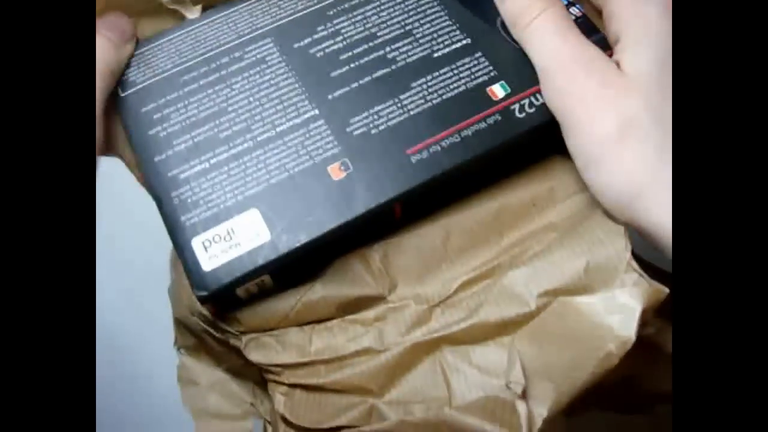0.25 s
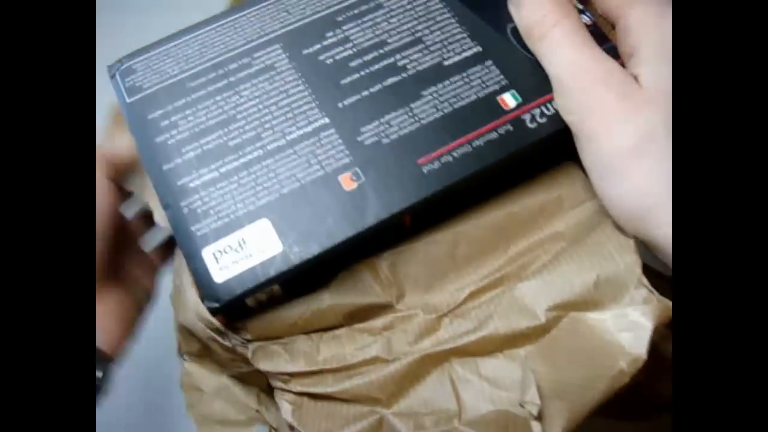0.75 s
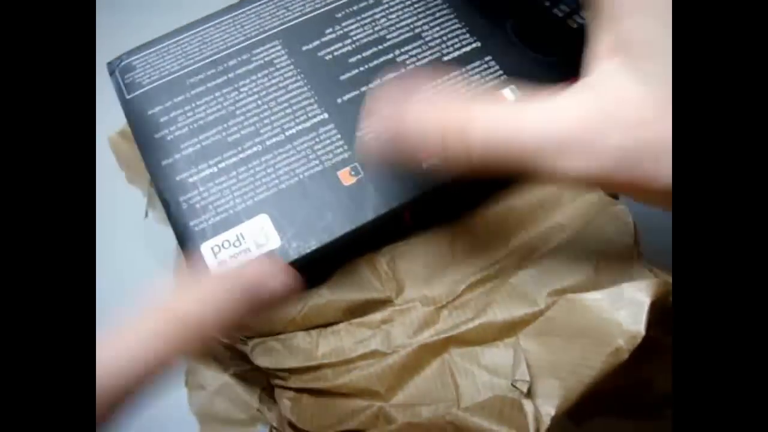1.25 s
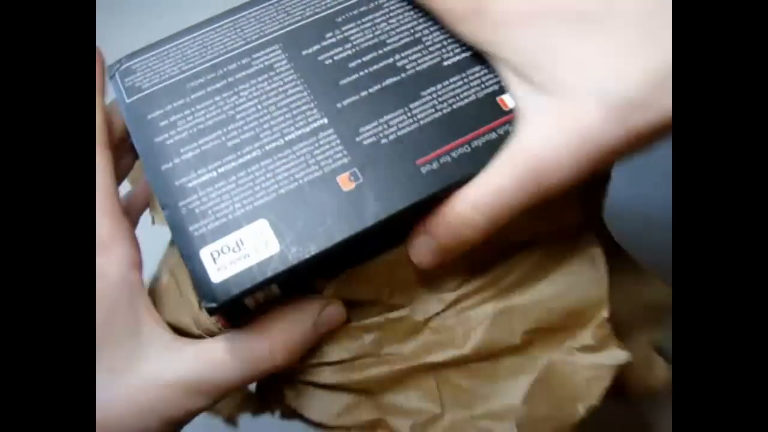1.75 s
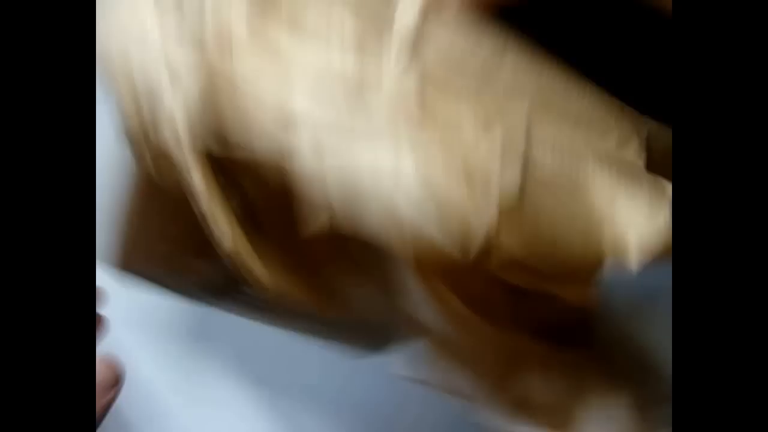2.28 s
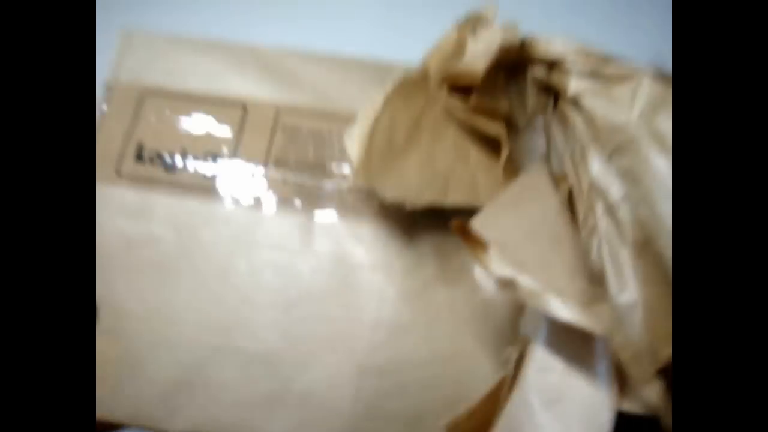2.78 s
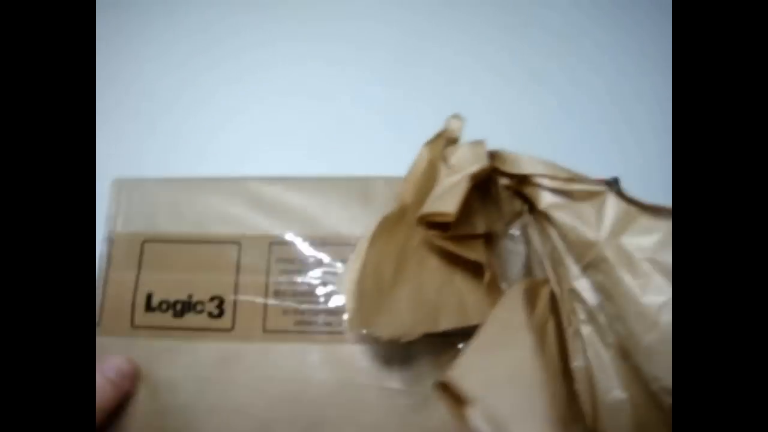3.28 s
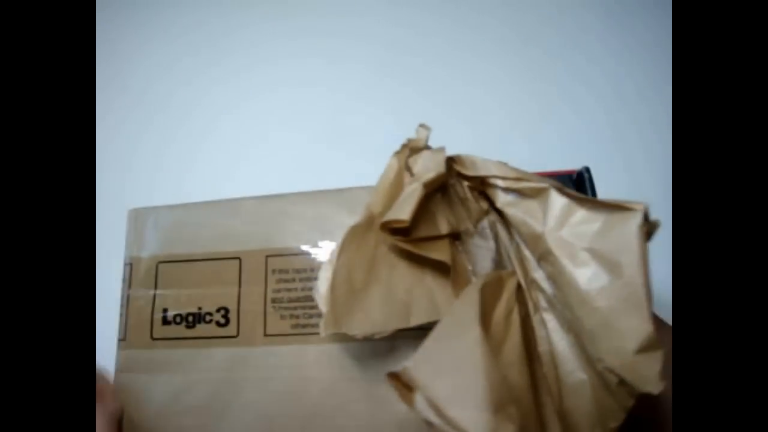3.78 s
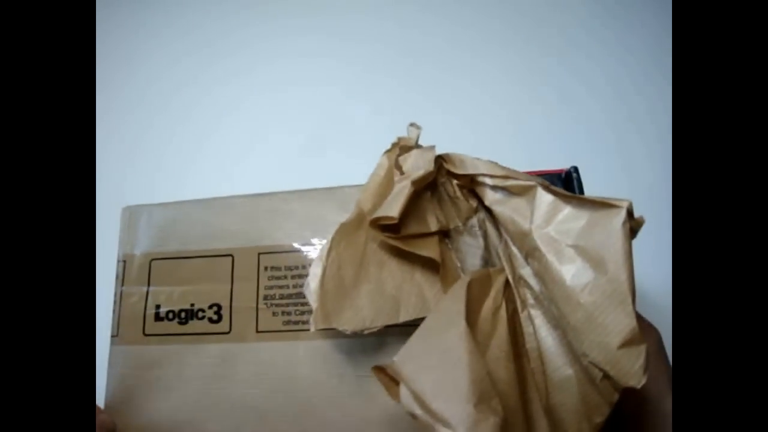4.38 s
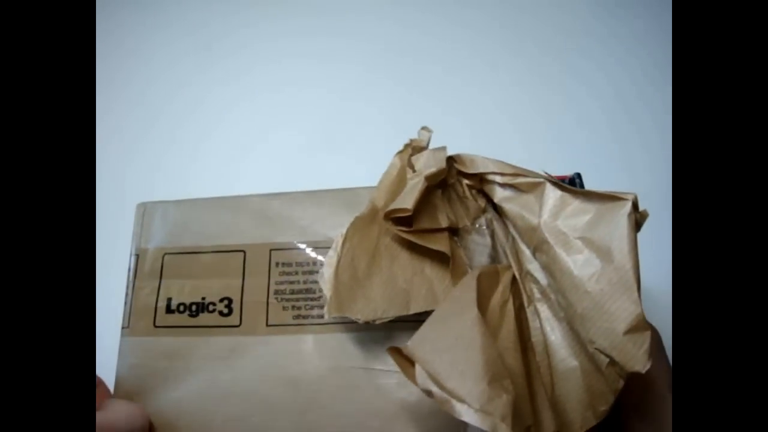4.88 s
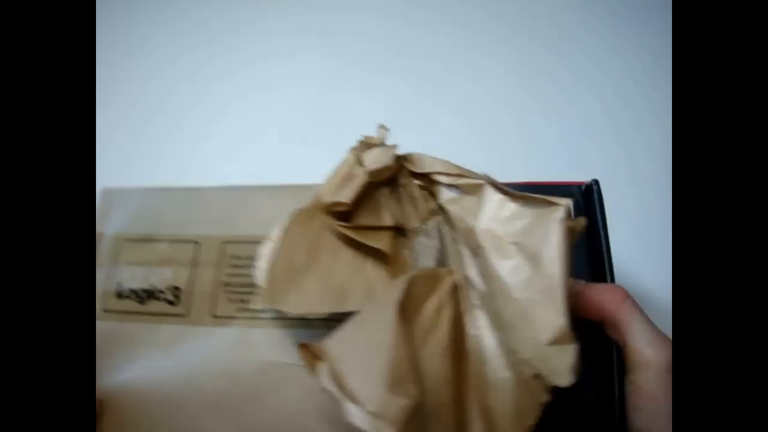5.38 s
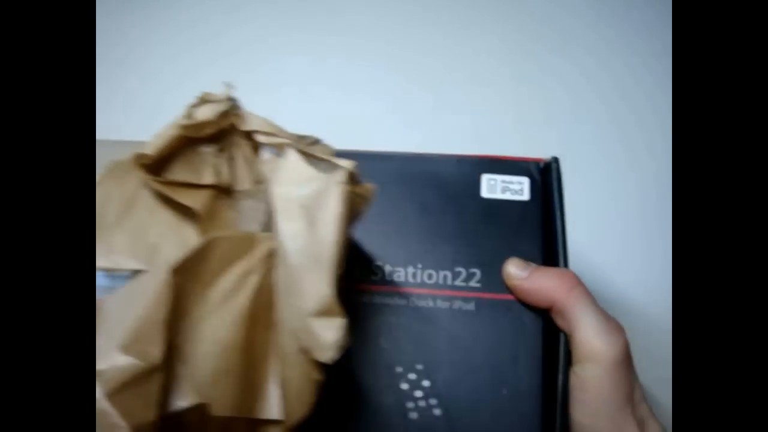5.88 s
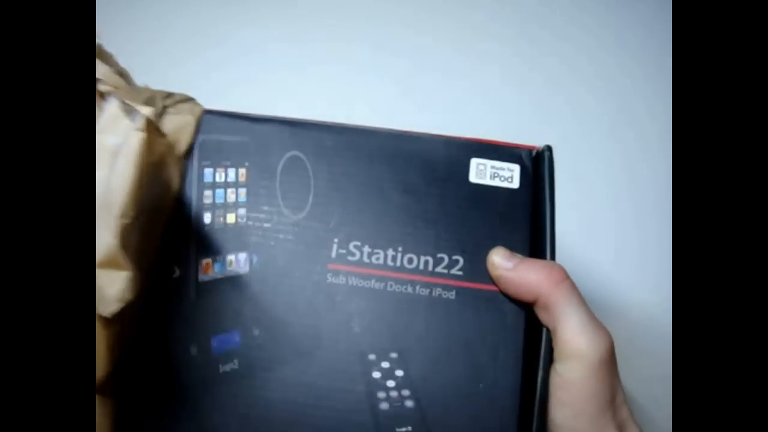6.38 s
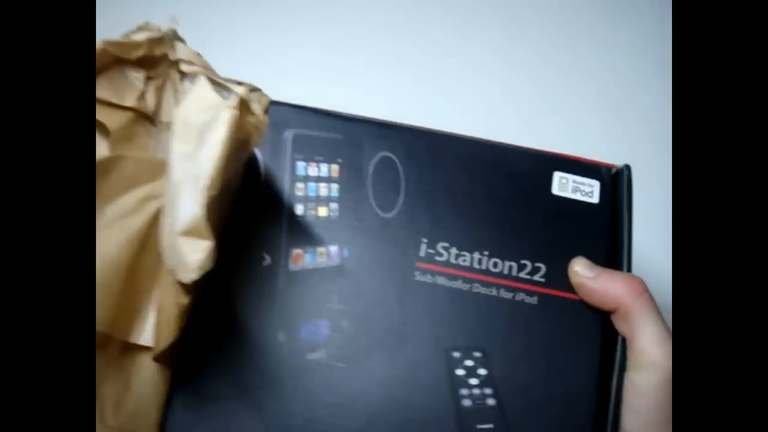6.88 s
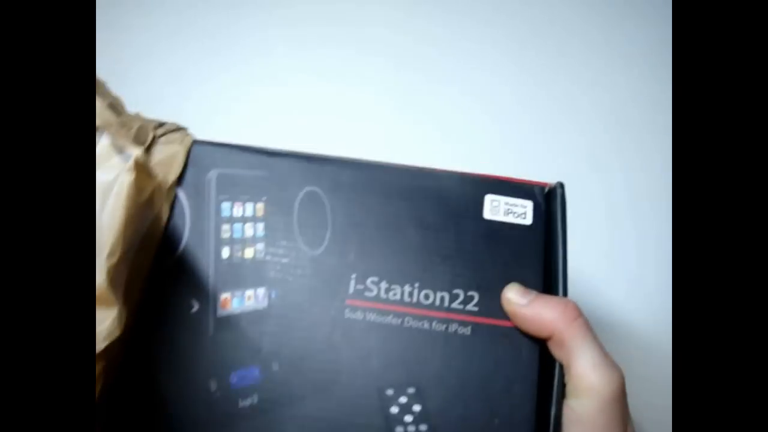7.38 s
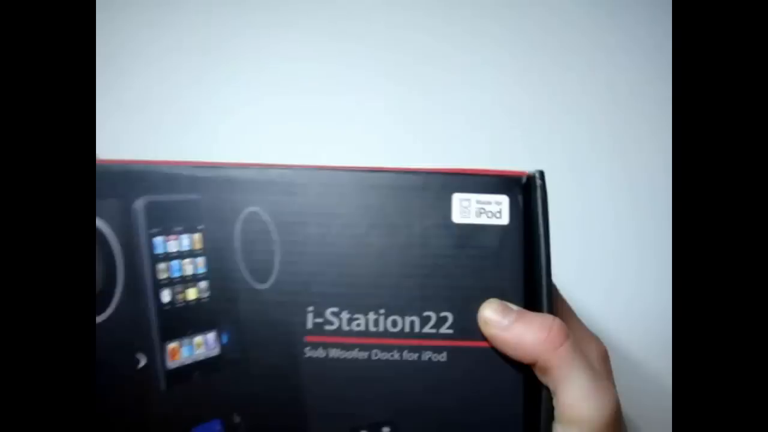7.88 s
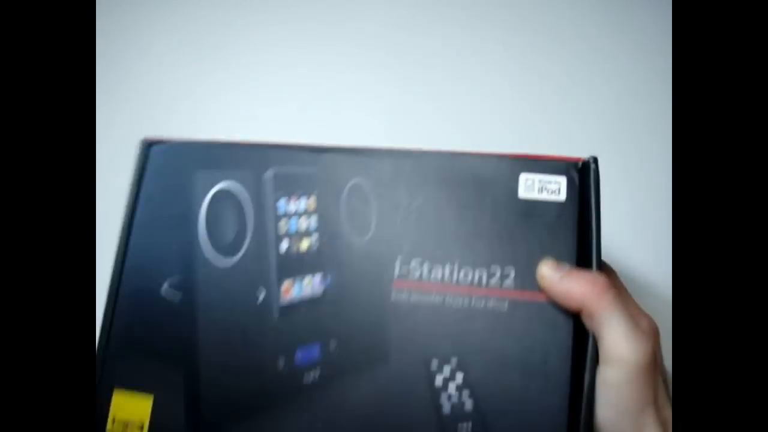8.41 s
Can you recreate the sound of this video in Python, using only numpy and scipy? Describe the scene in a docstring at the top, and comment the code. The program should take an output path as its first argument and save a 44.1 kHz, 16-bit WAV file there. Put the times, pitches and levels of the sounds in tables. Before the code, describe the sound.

Stiff packing paper is handled very close to one microphone in a small room. A short rustle breaks into a flurry of sharp snaps, then a gap, a few hard pulls, scattered creasing, and a longer steady slide off a cardboard box. Hollow rustles and dull bumps come from the box; low air puffs hit the microphone. A faint fan hums behind.

```python
"""A short rustle, then sharp snaps: stiff brown packing paper is pulled off a cardboard box, close to one
microphone in a small room. Creases buckle as cascades of slips that crack and ring the facets beside them.
Crackle and hiss make the rustle, which also sounds hollow through the box; edges scrape and bumps thud.
The moving sheet pushes puffs of air at the microphone, and a fan, made of coloured noise, runs faintly behind."""
import sys
import numpy as np
from scipy import signal
from scipy.fft import rfft, irfft, next_fast_len
from scipy.io import wavfile
from scipy.ndimage import uniform_filter1d

SR = 44100
rng = np.random.default_rng(int(sys.argv[2]) if len(sys.argv) > 2 else 0)


def generate_wav(sig):
    """Save sig (samples, or channels by samples) to the path in sys.argv[1] as 16-bit PCM at SR."""
    pcm = np.round(np.clip(np.atleast_2d(sig).T, -1, 1) * 32767).astype(np.int16)
    wavfile.write(sys.argv[1], SR, pcm)


N = 381465

TOP_HZ = 10100  # band limit of the camera, also the ceiling for facets and cracks

# The loudest creases to buckle, close to the microphone. Each row: start in seconds, level of the click in dB,
# ring of the freed facet in Hz, length scale of the cascade in seconds, ring over crack in dB.
SNAPS = [(0.1263, -24.5, 3740, 0.0023, -5), (0.1951, -19.5, 3560, 0.0042, 1),
         (0.238, -25, 1240, 0.0017, -12), (0.2755, -25, 1240, 0.00087, -5), (0.288, -21, 2640, 0.0026, -6),
         (0.318, -26, 3150, 0.0012, -3), (0.37, -25, 1380, 0.003, -3), (0.473, -33, 2270, 0.0045, 0),
         (0.519, -25, 4400, 0.002, -17), (0.5429, -17.5, 2270, 0.0056, -7), (0.556, -19, 3620, 0.0013, -3),
         (0.586, -17.5, 1970, 0.001, 8), (0.622, -23, 1420, 0.0033, -2), (0.651, -18.5, 2540, 0.0023, 6),
         (0.752, -30, 2800, 0.0014, -4), (0.783, -18, 2810, 0.011, -15), (0.817, -21, 2230, 0.0024, 1),
         (0.867, -25, 1270, 0.0012, 8), (0.878, -21.5, 4500, 0.007, -22), (0.934, -26.5, 4500, 0.0021, 0),
         (1.243, -38.5, 1480, 0.0054, 6), (1.5255, -27, 1320, 0.0047, -17), (1.545, -29, 1110, 0.0031, -8),
         (1.574, -25, 2470, 0.0044, -8), (1.5904, -24, 1320, 0.0027, -10), (1.683, -20, 1470, 0.0028, -16),
         (1.799, -18, 1450, 0.0012, -3), (1.9698, -33, 2200, .001, -1), (2.1442, -35, 3000, 0.0012, -3),
         (2.2291, -30.5, 2310, 0.0028, -5), (2.5726, -38, 2310, 0.001, -2), (2.6441, -24, 3420, 0.002, 1),
         (2.669, -27.5, 4180, 0.0033, -6), (2.8116, -23.5, 2600, 0.0023, 8),
         (2.89, -22.5, 1980, 0.0021, 4.5), (3.033, -21.5, 1750, 0.0041, -17),
         (3.206, -23, 1700, 0.0045, -1), (3.273, -38, 2950, .0015, 9), (3.3225, -32, 2600, 0.0033, -7),
         (3.3808, -29, 4930, 0.0012, 2), (3.4001, -16, 3150, 0.0081, -7), (3.4125, -23.5, 4730, 0.0036, 10),
         (3.515, -29, 890, 0.0015, 4), (3.5736, -21, 1450, 0.0043, -20), (3.6528, -18.5, 3120, 0.0059, -23),
         (3.761, -19, 2380, 0.0035, 1.5), (3.7904, -27, 4170, 0.0016, 6), (3.8295, -26.5, 3670, 0.002, -25),
         (3.838, -29, 1300, 0.002, -9), (3.9721, -29.5, 2720, 0.0013, -12),
         (4.0537, -18, 3420, 0.0096, -15), (4.092, -26, 2990, 0.0033, -4), (4.266, -20.5, 2940, 0.0074, -6),
         (4.341, -22.5, 2770, 0.0044, -25), (4.347, -26, 1600, 0.0043, -16),
         (4.428, -25.5, 3470, 0.0012, 1), (4.6092, -29.5, 2560, 0.001, -20), (4.632, -33, 3970, 0.002, -8),
         (4.6841, -24.5, 3070, 0.0028, -1), (4.7109, -25.5, 4200, 0.0039, -8),
         (4.7438, -23.5, 2560, 0.0093, -20), (4.805, -33, 2400, 0.0011, -5),
         (4.8167, -35, 4180, 0.00092, -4), (4.8476, -28.5, 2320, 0.0011, 4),
         (4.8796, -28, 2330, 0.00096, -4), (4.895, -30.5, 1750, 0.0012, -13),
         (4.937, -32, 2310, 0.0027, -15), (5.0575, -26, 3200, 0.0038, -18),
         (5.1284, -24.0, 2520, 0.005, -15), (5.2135, -22, 3870, 0.0055, 1), (5.527, -21, 1790, 0.0028, -1),
         (6.0879, -20, 1230, 0.0016, 0), (6.6082, -21, 1020, 0.0032, 18), (6.636, -21, 2750, 0.0088, -6),
         (6.7458, -35.5, 2820, .0015, 6), (6.8197, -25.5, 2900, 0.0033, 0), (6.972, -31, 980, 0.0037, -13),
         (7.0306, -20, 1490, 0.0049, -15), (7.058, -27, 2580, 0.0066, 4), (7.099, -25.5, 2900, 0.0032, -12),
         (7.161, -30.5, 1710, 0.0046, 7), (7.302, -26.5, 855, 0.0038, -1), (7.3282, -26.5, 990, 0.0034, -4),
         (7.3552, -22.5, 2400, 0.0065, -21), (7.427, -24, 1470, 0.0036, 0), (7.5069, -14.5, 2460, 0.007, 1),
         (7.557, -17, 2470, 0.0048, 0.5), (7.633, -22, 2500, 0.0042, -5), (7.66, -27, 1530, 0.0018, -9),
         (7.8665, -19, 2340, 0.0092, -7), (8.3077, -20, 1980, 0.0058, -10),
         (8.3511, -22, 4400, 0.0065, -10), (8.4665, -26.5, 5150, 0.0055, -20),
         (8.6396, -26.5, 2730, 0.0028, -4)]
THUD_DB = -12.5  # the sheet's thud, relative to the snap that jolts it
FIRST_CLICK_DB, SOFTER_DB_PER_S = -4, 1001  # the opening click's share falls as the cascade gets longer


def snaps():
    """Each large snap also jolts the whole sheet, which answers with a dull, short thud."""
    track = np.zeros(N)
    for s, db, ring_hz, length, ring_db in SNAPS:
        first_db = FIRST_CLICK_DB - SOFTER_DB_PER_S * length
        click = snap(ring_hz, length, ring_db, first_db)
        add(track, s, amp(db) * level_in_10_ms(click + amp(THUD_DB) * thud()))
    return track


SLIPS_PER_S, FACET_Q = 3500, 3.16  # mean rate of slips within one snap; how purely a facet rings
# the broad crack: its reference centre, how far it follows the facet's pitch, its width relative to its centre
CRACK_HZ, CRACK_FOLLOWS, CRACK_WIDTH = 4750, 0.66, 2.25


def snap(ring_hz, length, ring_db, first_db, size=4096):
    """A crease gives way in a short cascade of separate slips; each cracks broadly and rings the facet beside it."""
    t = np.arange(size) / SR
    slips = np.tanh(rng.standard_normal(size)) * (rng.random(size) < SLIPS_PER_S / SR)
    fade_s = max(2.12 * length, 1 / SR)
    cascade = unit(slips * np.exp(-(t / fade_s) ** 2))
    cascade[0] = np.sqrt(size) * amp(first_db)  # the opening click
    ring = filtered(cascade, lambda f: resonance(f, ring_hz, ring_hz / FACET_Q) ** 2)
    crack_hz = CRACK_HZ * (ring_hz / CRACK_HZ) ** CRACK_FOLLOWS
    crack = filtered(cascade, lambda f: resonance(f, crack_hz, CRACK_WIDTH * crack_hz) ** 2 * (f < TOP_HZ))
    return unit(amp(ring_db) * unit(ring) + unit(crack))


# the largest ticks over the handling level, their ceiling, the spread below
TICK_OVER_DB, TICK_TOP_DB, TICK_RANGE_DB = 4, -25, 8
TICK_CROWDING = .9  # exponent: how strongly ticks crowd into the harder handling


def ticks(count=200):
    """Small creases let go at random, each with its own pitch; harder handling frees more and louder ones."""
    crisp_db, track = handling()[0], np.zeros(N)
    due = np.cumsum(amp(TICK_CROWDING * crisp_db) * unevenness(np.arange(N) / SR) ** 2)
    for place, pitch, strength, span in rng.random((count, 4)):
        at = np.searchsorted(due, place * due[-1])
        db = min(crisp_db[at] + TICK_OVER_DB, TICK_TOP_DB) - TICK_RANGE_DB * strength
        click = snap(ring_hz=900 * 5 ** pitch, length=.0007 * 5 ** span, ring_db=4, first_db=-6)
        add(track, at / SR, amp(db) * level_in_10_ms(click))
    return track


# Colour of the crisp rustle close by. Each row: frequency in Hz, relative density in dB per Hz.
CRISP_SPECTRUM = [(300, -34), (900, -24), (1600, -2.5), (2300, 0), (3200, -1.5), (4400, -1.8), (7000, -5.5),
                  (10000, -8)]
# Colour of the hollow rustle before the box. Each row: frequency in Hz, relative density in dB per Hz.
HOLLOW_SPECTRUM = [(40, -4), (150, -15), (230, -3.5), (320, -2.5), (550, -5), (800, 1.5), (1400, 3.5),
                   (2000, 5), (3200, 4), (8000, -33)]
# Resonances of the box under the paper. Each row: frequency in Hz, width in Hz, level in dB.
BOX_MODES = [(503, 14, -7), (765, 78, -4.5), (980, 40, -2), (1325, 45, -8), (1510, 43, -6.5)]
# How much of the crisp rustle is buckling rather than smooth friction. Each row: handling level in dB,
# share of the power while crumpling (0 to 1).
BUCKLING = [(-44, 0.43), (-33, 0.63)]
DULLING = 0.3  # dB by which the hollow rustle loses treble and gains bass per dB of gentler handling


def rustle():
    """Hard squeezes buckle the paper into crackle; light brushing and steady sliding give a fine hiss."""
    crisp_db, hollow_db = handling()
    buckling = np.interp(crisp_db, *np.transpose(BUCKLING)) * unevenness(np.arange(N) / SR)
    small = crackle(rate=1800, centre_hz=3670, spread=1.435, cycles=3.05, scatter_db=3.0)
    activity = 0.21 + np.tanh(avalanches(rate=70, fade=0.0098))
    grains = unit(activity * coloured(small, [(1500, -4), (8000, 15.5)]))
    hiss = patchy(rng.standard_normal(N), depth_db=3.0)
    mixed = np.sqrt(buckling) * grains + np.sqrt(1 - buckling) * hiss
    crisp = patchy(coloured(mixed, CRISP_SPECTRUM), depth_db=2.0, size=512)

    # large facets flex more slowly and sound through the box beneath; gentle handling leaves them dull
    large = crackle(rate=900, centre_hz=916, spread=1.523, cycles=1.3, scatter_db=3.5)
    smooth = unit(coloured(rng.standard_normal(N), HOLLOW_SPECTRUM))
    hollow = unit(coloured(large, HOLLOW_SPECTRUM)) + amp(0.5) * smooth
    boxed = filtered(hollow, lambda f: 1 + sum(amp(db) * resonance(f, hz, width) for hz, width, db in BOX_MODES))
    boxed = patchy(boxed, depth_db=3.0, size=512)
    tilt_db = DULLING * np.clip(crisp_db + 27, -13, 5)
    boxed = shelf(boxed, corner_hz=430, gain_db=tilt_db) / amp(tilt_db)  # moves the bass alone
    boxed = shelf(boxed, corner_hz=1390, gain_db=tilt_db)
    return amp(crisp_db - 2.5) * crisp + amp(hollow_db - 4.5) * boxed


# Pulls and squeezes of the paper at the box. Each row: start in seconds, hold in seconds, crisp crackle in dB,
# hollow rustle of the sheet on the box in dB (both before the trims in the rustle).
PULLS = [(0, 0.028, -28.5, -30), (0.082, 0.02, -29, -28.5), (0.14, .04, -30.5, -58),
         (0.194, 0.015, -30.5, -30), (0.288, 0.064, -47.5, -27), (0.465, 0.018, -24, -27.5),
         (0.519, 0.1, -25.5, -29), (0.796, 0.096, -24, -27), (0.916, 0.041, -27.5, -32),
         (1.53, .16, -33.5, -30.5), (1.778, 0.078, -18.5, -22), (1.885, 0.11, -17.5, -29),
         (2.065, 0.036, -22, -26.5), (2.15, .07, -37.5, -28.5), (2.775, 0.034, -25, -28.5),
         (3.048, 0.044, -18, -20.5), (3.504, .03, -39, -34), (3.657, 0.02, -26, -29.5),
         (3.839, 0.06, -37, -35.5), (4.069, .025, -35, -33.5), (4.245, .05, -31.5, -51),
         (4.338, 0.038, -27, -28), (4.793, .12, -48, -28.5), (5.226, 0.098, -17.5, -26),
         (5.409, 0.14, -20.5, -27.5), (5.581, 0.3775, -19.5, -21.5), (5.978, 0.15, -21.5, -24.5),
         (6.141, 0.12, -20, -28), (6.301, .05, -26, -32), (6.364, 0.055, -17.5, -28),
         (6.446, .045, -24, -30), (6.535, 0.06, -19.5, -25), (6.637, .02, -21, -41),
         (6.835, 0.059, -44, -34.5), (6.971, 0.036, -38.5, -42), (7.019, 0.092, -56, -30),
         (7.343, .06, -38.5, -34), (7.412, 0.11, -20, -19.5), (7.584, 0.06, -27, -23.5),
         (7.662, .06, -19, -19), (7.751, .04, -25, -29), (7.912, 0.055, -21.5, -21.5),
         (8.118, .09, -20.5, -21.5), (8.455, 0.019, -26.5, -24.5)]
# Faint rustle of the paper held between pulls. Each row: time in seconds, crisp level in dB (before the trim).
HELD = [(0, -39.5), (.96, -34.5), (1.06, -50), (1.51, -51.5), (1.6, -34.5), (2.12, -39), (2.3, -48.5),
        (2.52, -46.5), (2.7, -39), (3.55, -37.5), (4.55, -46.5), (5.15, -42), (5.4, -25.5), (6.68, -26.5),
        (6.88, -58), (7.29, -52), (7.38, -29), (8.08, -30), (8.3, -38.5), (8.62, -45.5)]
HELD_HOLLOW_DB = 1  # its hollow part, relative to the crisp part
# time constants: a pull takes hold more slowly the longer it is (share of its hold); the paper then settles
ATTACK_S, ATTACK_SHARE, RELEASE_S = .002, .05, 0.03


def handling():
    """Crisp and hollow level in dB: every pull rises, holds and settles, over the rustle of the held paper."""
    t = np.arange(N) / SR
    held = amp(np.interp(t, *np.transpose(HELD))) ** 2
    crisp, hollow = held.copy(), held * amp(HELD_HOLLOW_DB) ** 2  # powers
    u = np.arange(-SR // 10, SR) / SR  # seconds from the start of a pull
    for s, hold, crisp_db, hollow_db in PULLS:
        rise = (1 + np.tanh(u / (ATTACK_S + ATTACK_SHARE * hold) / 2)) / 2
        effort = rise * np.exp(-np.maximum(u - hold, 0) / RELEASE_S)
        effort = effort[s + u >= 0]
        add(crisp, s + u[0], (amp(crisp_db) * effort) ** 2)
        add(hollow, s + u[0], (amp(hollow_db) * effort) ** 2)
    return 10 * np.log10(crisp), 10 * np.log10(hollow)


SLIDE_START_S, SLIDE_END_S = 5.38, 6.62  # the sheet is drawn steadily off the box between these times
SLIDE_SMOOTHING = .4  # how much of the crackle and unevenness steady sliding takes away


def unevenness(t):
    """1 while the paper is crumpled, less while it slides steadily."""
    return np.where((t > SLIDE_START_S) & (t < SLIDE_END_S), 1 - SLIDE_SMOOTHING, 1)


def crackle(rate, centre_hz, spread, cycles, scatter_db, size=200):
    """Tiny buckles at random times, each a facet that rings for a few cycles, with scattered strengths."""
    place, pitch, strength, side = rng.random((int(rate * N / SR), 4)).T
    hz = np.minimum(centre_hz * 2 ** (spread * (2 * pitch - 1)), TOP_HZ)  # spread in octaves either way
    turns = hz[:, None] * np.arange(size) / SR
    gain = np.sign(side - .5) * amp(-scatter_db * np.log(strength + .02))
    rings = gain[:, None] * np.cos(2 * np.pi * turns) * np.exp(-turns / cycles)
    at = (place * N).astype(int)[:, None] + np.arange(size)
    return unit(np.bincount(at.ravel(), rings.ravel(), N + size)[:N])


def avalanches(rate, fade):
    """One buckle sets off its neighbours: activity jumps at random moments, then dies away."""
    triggers = (rng.random(N) < rate / SR) * rng.random(N)
    return signal.lfilter([1], [1, -np.exp(-1 / (fade * SR))], triggers)


def patchy(x, depth_db, size=128):
    """The sheet keeps changing shape, so broad patches of its sound come and go."""
    _, t, z = signal.stft(x, SR, nperseg=size)
    across_pitch = uniform_filter1d(rng.standard_normal(z.shape), size=5, axis=0)
    field = unit(uniform_filter1d(across_pitch, size=12, axis=1))
    changed = z * amp(depth_db * unevenness(t) * field)
    return unit(signal.istft(changed, nperseg=size)[1][:N])


# The sheet drags over an edge of the box. Each row: centre in seconds, level at the centre in dB,
# middle pitch in Hz, half length in seconds (to 1/e).
SCRAPES = [(0.606, -23, 2350, 0.046), (1.815, -21, 1540, 0.022), (5.305, -26, 4000, 0.035),
           (5.925, -19, 1290, 0.042), (7.432, -19, 1170, 0.0073), (7.703, -27.5, 1900, 0.015),
           (7.923, -24.5, 2540, 0.054)]


def scrapes():
    """Quick stick and slip on a cardboard edge rings large facets around one pitch for a moment."""
    t, track = np.arange(N) / SR, np.zeros(N)
    for s, db, hz, half in SCRAPES:
        slips = crackle(rate=690, centre_hz=hz, spread=0.38, cycles=1.9, scatter_db=-0.5)
        track += amp(db) * np.exp(-((t - s) / half) ** 2) * slips
    return track


# Fingers and paper bump the box. Each row: start in seconds, level of the thud in dB.
BUMPS = [(.237, -25.5), (.586, -28.5), (.868, -29), (1.97, -33), (2.174, -34), (2.382, -34.5),
         (2.5134, -25.5), (3.4139, -31), (3.972, -33), (4.61, -32.5), (4.745, -32), (5.057, -37.5),
         (5.727, -24), (7.03, -31), (7.355, -31), (7.39, -23.5)]
BUMP_HZ, BUMP_TAP_DB = 886, -3.5  # ring of the contact; its tap, relative to the thud


def bumps():
    """A bump on the box is mostly thud, with a light tap at the contact."""
    track = np.zeros(N)
    for s, db in BUMPS:
        tap = snap(BUMP_HZ, length=0.0024, ring_db=-28.0, first_db=-8.0)
        add(track, s, amp(db) * level_in_10_ms(thud() + amp(BUMP_TAP_DB) * tap))
    return track


# Colour of the dull thud from sheet and box. Each row: frequency in Hz, relative density in dB per Hz.
THUD_SPECTRUM = [(40, -20), (150, -8), (300, -1), (650, 3), (1100, 0.5), (3000, -37), (9000, -38)]


def thud(size=4096):
    """The dull, short answer of the whole sheet and the box to a jolt."""
    shake = rng.standard_normal(size) * np.exp(-np.arange(size) / SR / 0.0086)
    shake[0] = 8  # the jolt itself
    return unit(coloured(shake, THUD_SPECTRUM))


# Air pushed at the microphone. Each row: time of the deepest dip in seconds, base level in dB
# (the dip and its flutter are set relative to it).
PUFFS = [(0.2, -36), (0.469, -36), (0.584, -34), (0.8, -36), (0.89, -38), (1.801, -30), (1.969, -32),
         (4.268, -44), (4.348, -41), (5.607, -35.5), (6.57, -41), (6.637, -37), (7.438, -32.5),
         (7.663, -31), (7.763, -36.5), (8.15, -36)]


def puffs(size=4096):
    """A flapping sheet sends one brief dip of pressure, with a soft flutter that outlasts it."""
    track, t = np.zeros(N), np.arange(size) / SR
    spectrum = [(30, -23.0), (70, -1.0), (140, 6.0), (260, 3.0), (700, -32.0)]  # Hz, dB per Hz
    for (s, db), chance in zip(PUFFS, rng.standard_normal(len(PUFFS))):
        rise = 0.00172 * np.exp(0.35 * chance)
        dip = (t / rise / 2) ** 2 * np.exp(2 - t / rise)  # reaches 1 at twice the rise
        soft = unit(coloured(rng.standard_normal(size), spectrum)) * np.exp(-t / 0.024)
        add(track, s - 2 * rise, amp(db) * (amp(-1.0) * soft - amp(8.5) * dip))
    return filtered(track, lambda f: 1j * f / (1j * f + 20))  # the microphone passes no steady pressure


# stirred air: level relative to the handling level, centre and width of its band
FLUTTER_DB, FLUTTER_HZ, FLUTTER_WIDTH_HZ = -30, 50, 100


def flutter():
    """The moving sheet also stirs the air in small, irregular low bumps."""
    air = filtered(rng.standard_normal(N), lambda f: resonance(f, FLUTTER_HZ, FLUTTER_WIDTH_HZ) ** 2)
    return amp(handling()[0] + FLUTTER_DB) * unit(air * avalanches(rate=18, fade=0.013))


# Decay of the small room. Each row: frequency in Hz, time to fall by 60 dB in seconds.
ROOM = [(150, 0.68), (1000, 0.63), (4000, 0.52), (10000, 0.093)]


def room(x, count=24):
    """A diffuse tail that changes as the paper moves about: each stretch of sound gets its own."""
    wet = np.zeros(N)
    hop = N // count + 1
    for start in range(0, N, hop):
        hz, t, z = signal.stft(rng.standard_normal(SR // 2), SR, nperseg=256)
        decay = amp(-60 * t / along(ROOM, hz)[:, None])
        tail = signal.istft(z * decay, SR, nperseg=256)[1]
        tail = tail * (1 - np.exp(-np.arange(len(tail)) / SR / 0.017))  # builds up gradually
        add(wet, start / SR, signal.fftconvolve(x[start:start + hop], tail / np.linalg.norm(tail)))
    return wet


# Colour of the fan, faint in the background. Each row: frequency in Hz, relative density in dB per Hz.
FAN_SPECTRUM = [(20, -24.5), (80, -25), (120, 3), (160, -6.5), (436, -2), (720, 1), (930, 1), (1300, -12),
                (3500, -24), (10000, -25.5)]


def fan():
    """A steady, faint rush with a low hum, both from coloured noise."""
    return amp(-50.0) * unit(coloured(rng.standard_normal(N), FAN_SPECTRUM))


def amp(db):
    """Decibels to gain."""
    return 10 ** (np.asarray(db) / 20)


def unit(x):
    """Scale to rms 1."""
    return x / np.sqrt(np.mean(x ** 2) + 1e-20)


def level_in_10_ms(x):
    """Rescale a burst of rms 1 so that its whole energy, gathered in 10 ms, would have rms 1."""
    return x * np.sqrt(.01 * SR / len(x))


def along(points, hz):
    """(Hz, value) points read on a log axis."""
    f, v = np.transpose(points)
    return np.interp(np.log(hz + 1), np.log(f), v)


def filtered(x, response):
    """x times a complex response of frequency."""
    m = next_fast_len(2 * len(x))
    return irfft(rfft(x, m) * response(np.fft.rfftfreq(m, 1 / SR)), m)[:len(x)]


def coloured(x, spectrum, size=4096):
    """Causal (minimum-phase) colouring, so that clicks keep their sharp fronts."""
    gain = amp(along(spectrum, np.fft.rfftfreq(size, 1 / SR)))
    cepstrum = irfft(np.log(gain))
    cepstrum[1:size // 2] *= 2
    cepstrum[size // 2:] = 0
    return signal.fftconvolve(x, irfft(np.exp(rfft(cepstrum))))[:len(x)]


def resonance(f, hz, width):
    """Response of one damped mode."""
    return 1j * f * width / (hz * hz - f * f + 1j * f * width)


def shelf(x, corner_hz, gain_db):
    """Raise or lower everything above a corner, by a gain that may change with time."""
    low = filtered(x, lambda f: 1 / (1 + (f / corner_hz) ** 4))
    return low + amp(gain_db) * (x - low)


def add(track, s, sound):
    """Mix a sound into the track at time s."""
    start = max(round(s * SR), 0)
    part = track[start:start + len(sound)]
    part += sound[:len(part)]


def scene():
    """Paper, air and fan, heard by one microphone on both channels."""
    clicks = snaps() + bumps() + ticks()
    sheet = rustle() + scrapes()
    reverberation = room(amp(-17) * clicks + amp(-16.0) * sheet)
    mono = clicks + sheet + reverberation + puffs() + flutter() + fan()
    return np.array([mono, mono])


def record(dry):
    """The camera cuts steeply above its band limit."""
    return np.array([filtered(channel, lambda hz: 1 / np.sqrt(1 + (hz / TOP_HZ) ** 240)) for channel in dry])


dry = scene()
out = record(dry)
generate_wav(out)
```